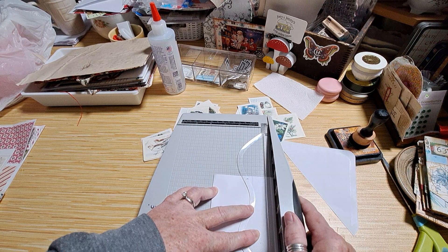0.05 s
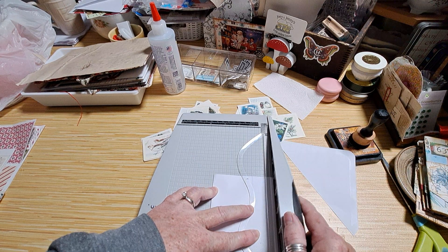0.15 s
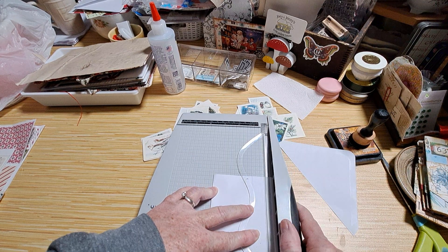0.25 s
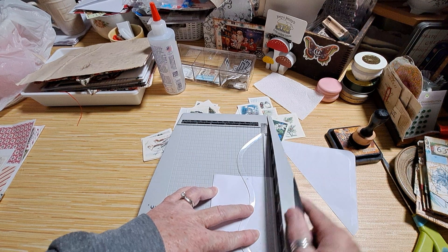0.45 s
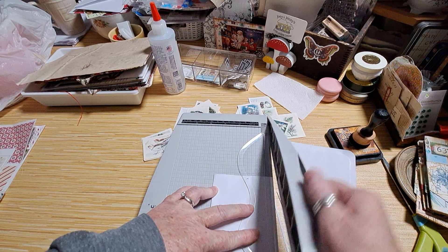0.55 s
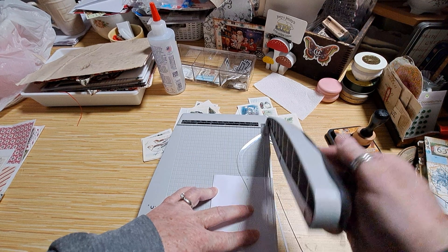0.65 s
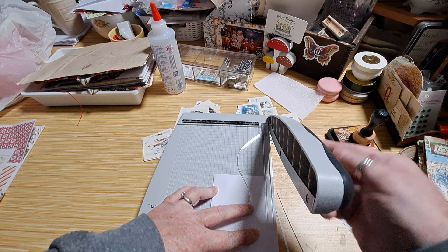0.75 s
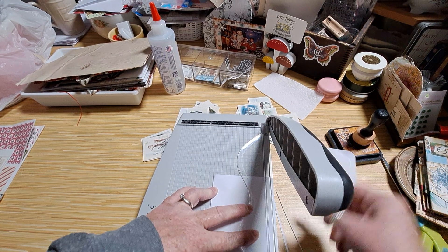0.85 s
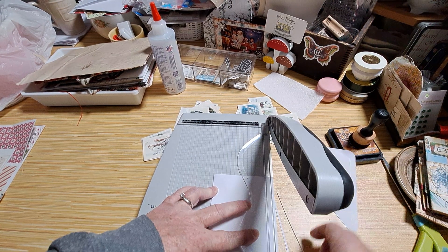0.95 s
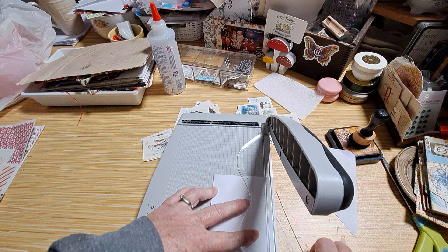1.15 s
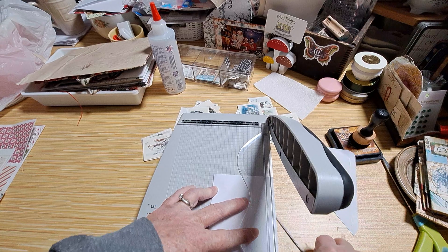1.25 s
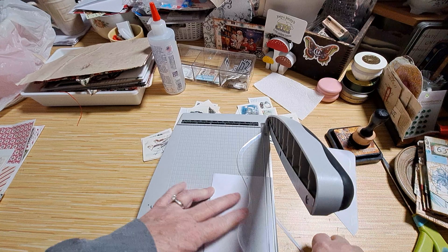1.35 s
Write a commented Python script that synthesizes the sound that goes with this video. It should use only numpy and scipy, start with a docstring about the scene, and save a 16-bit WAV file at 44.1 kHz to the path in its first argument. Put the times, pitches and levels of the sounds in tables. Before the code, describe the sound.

Guillotine paper cutter chops with one sharp thunk, then its arm lifts with a metallic scraping hiss

```python
"""A guillotine paper trimmer on a wooden desk in a small quiet room, close to a stereo microphone.
Its blade shears the last of the sheet (grainy noise) and the arm thumps onto the base (pulse, modes, rattle, tail).
It is drawn up again, steel hissing along steel (noise and resonances) and the hinge rubbing (random slips ringing
modes), and knocks against its stop. A hand shuffles on the desk, mostly at the end (lumpy noise), with paper
rustling and snapping."""
import sys
import numpy as np
from scipy import signal
from scipy.fft import rfft, irfft, next_fast_len
from scipy.io import wavfile

SR = 44100
rng = np.random.default_rng(int(sys.argv[2]) if len(sys.argv) > 2 else 0)


def unload_wav(signal):
    """Save mono or channel-first audio to the path in sys.argv[1] as 16-bit WAV at rate SR, clipped to [-1, 1]."""
    wavfile.write(
        sys.argv[1],
        SR,
        np.round(np.clip(np.atleast_2d(signal).T, -1, 1) * 32767).astype(np.int16),
    )


N = 61739

# Background hush, level over time: start_s, level_db
HUSH_LEVEL = [(0, -45.5), (.2, -103), (.5, -52.5), (.88, -66.5), (1.05, -72), (1.4, -81.5)]
# Background hush, colour: freq_hz, density_db (per Hz)
HUSH_COLOUR = [(30, -3), (60, 0), (120, -3), (200, -3.5), (330, -2.5), (620, 0), (850, -17.5),
               (1500, -19.5), (3300, -27.5), (7500, -27.5), (16000, -31)]

# Arm and hand blows on the base: start_s, level_db, contact_cutoff_hz (hardness), extra_bass_db (weight)
BLOWS = [(0.0005, -41.5, 2433, 10), (0.0691, -52, 896, -6.5), (0.2343, -24, 700, 10),
         (0.241, -22.5, 900, 2.5), (0.262, -11, 5200, -8), (0.2667, -7, 918, -3.5),
         (0.501, -27, 995, -11.5), (1.0825, -48.5, 896, 10.5)]
# Modes of base and desk: freq_hz, level_db, t60_s
BASE_MODES = [(56.9, -11, 0.44), (131, -5, 0.096), (168.7, -5, 0.25), (286.2, -3, 0.099), (319.5, 0.5, 0.1),
              (420, -11.5, 0.14), (496, -6.5, 0.2), (613.5, 5.5, 0.05), (820, 2.5, 0.015), (1098, -2, 0.12),
              (1294, -16.5, 0.11), (1594, -2, 0.061), (1791, 4.5, 0.1), (2110, -6.5, 0.088),
              (2700, -5, .08), (2837, 5, 0.065)]
# Crack of the contact: freq_hz, density_db (per Hz)
CRACK_COLOUR = [(600, -5), (2000, -12), (7000, -15.5), (13000, -6), (16000, -5)]
# Rattle of the dense upper modes: freq_hz, density_db (per Hz)
RATTLE_COLOUR = [(59, -46.5), (100, -13), (502, -9), (1450, -10.5), (2990, -11.5), (3400, -18), (7770, -15),
                 (16000, -49)]
# Rattle decay: freq_hz, t60_s
RATTLE_T60 = [(100, 0.13), (500, 0.11), (2000, 0.19), (16000, .15)]
# Room tail after a blow: freq_hz, density_db (per Hz)
TAIL_COLOUR = [(35, -41), (60, 0), (103, -17.5), (176, -11.5), (515, -14.5), (822, -23), (1950, -17),
               (3270, -26), (16000, -15.5)]
# Tail decay: freq_hz, t60_s
TAIL_T60 = [(60, 0.62), (300, 0.76), (1500, 0.62), (6000, 0.39), (16000, 0.41)]
PULSE_DB, CRACK_DB, MODES_DB, RATTLE_DB, TAIL_DB = 25.5, 2, -10, -7.5, -16.5
WEIGHT_HZ = 302  # a blow's extra bass fades out above this
PULSE_HZ, PULSE_LEAN_DB = 2520, 3.5  # the lean lifts the left and lowers the right
CRACK_T60_S = 0.027
TAIL_SMOOTHING_HZ = 1 / 0.0039  # softens the tail's onset

# Finger shuffles: start_s, level_db, decay_s, brightness_db_per_octave (about 500 Hz)
SHUFFLES = [(0.071, -53.5, 0.024, 1.5), (1.08, -52.5, 0.068, 1), (1.172, -51, 0.046, 1.5),
            (1.264, -54, .03, 3.5), (1.325, -56, 0.029, 5), (1.382, -58.5, 0.029, 3)]
# Fingers on the desk: freq_hz, density_db (per Hz)
HAND_COLOUR = [(29, -62), (50, -8.5), (324, -5), (550, -5.5), (620, -2), (1210, -21.5), (3000, -36.5),
               (3900, -62), (6600, -120)]
# Paper rustle over time: start_s, level_db
RUSTLE_LEVEL = [(.9, -100), (.97, -74), (1.06, -80.5), (1.1, -74), (1.15, -86.5), (1.3, -79), (1.33, -64),
                (1.4, -66)]
# Paper rustle and faint hiss: freq_hz, density_db (per Hz)
RUSTLE_COLOUR = [(1200, -5), (1800, -5.5), (4000, 8.5), (7500, 5.5), (16000, 9)]
# Paper snaps: start_s, level_db
SNAPS = [(0.3775, -58), (0.4713, -49), (0.8996, -59), (1.0175, -57), (1.0815, -54), (1.172, -62),
         (1.2666, -62), (1.3282, -53), (1.391, -56)]
# Colour of a snap: freq_hz, density_db (per Hz)
SNAP_COLOUR = [(4000, -15.5), (7500, 2.5), (10000, -13.5), (13500, -1), (16000, -6.5)]
SHUFFLE_RISE_S, SNAP_T60_S, HISS_DB = .003, 0.009, -87

# Blade through paper: start_s, level_db
SHEAR_LEVEL = [(.218, -76), (.23, -38.5), (.238, -25), (.247, -36.5), (.262, -44)]
# Parting fibres: freq_hz, density_db (per Hz)
SHEAR_COLOUR = [(240, -34), (400, -3), (2180, -16), (5190, -13), (9470, -20.5), (13100, -20), (16000, -36)]

# Blade along its steel edge: start_s, level_db, tilt_db_per_octave (about 4000 Hz)
SLIDE_LEVEL = [(.499, -48, 0), (.5055, -48.5, 2), (.509, -28, -1), (.53, -30.5, 0), (.575, -33, -3),
               (.62, -43.5, -5.5), (.67, -49.5, -4.5), (.72, -59, -5), (.79, -83, -5)]
# Steel hiss: freq_hz, density_db (per Hz)
SLIDE_COLOUR = [(300, -32), (500, -26.5), (700, -5), (1300, -14.5), (1900, -3.5), (4000, -9.5), (8000, -7),
                (10500, -25.5), (12500, -5.5), (16000, -26)]
# Blade resonances: freq_hz, width_hz, bite_level_db, slide_level_db
BLADE_MODES = [(1624, 31, -4.5, -30), (2170, 50, -16.5, -21.5), (2790, 30, -6.5, -13),
               (3113, 32, -19, -10.5), (4044, 80, -1, -22.5), (4760, 59, -20.5, -17.5),
               (5186, 64, -1.5, -17.5), (5662, 89, -0.5, -20), (6380, 110, -7.5, -23.5),
               (7970, 42, -5, -11), (10800, 500, -12, -20)]
# Blade striking the steel edge: start_s, level_db
BITES = [(0.2351, -39.5), (0.2402, -35), (0.2615, -26.5), (.5085, -30.5), (0.5133, -30), (0.519, -33.5)]

# Hinge rub: start_s, level_db (before a trim in arm()), centre_hz (of the excited modes)
HINGE_RUB = [(.54, -71, 1100), (.575, -36.5, 930), (.62, -31, 814), (.66, -34.5, 784), (.70, -38.5, 620),
             (.725, -47, 530), (.76, -49.5, 437), (.79, -69, 404)]
# Arm modes: freq_hz, rub_level_db (before the same trim), stop_level_db, t60_s
ARM_MODES = [(342, 9.5, -17.5, 0.037), (478, -1.5, -25, 0.043), (653, -6, -5, 0.057),
             (712, -3.5, -19, 0.022), (775, -4, -28.5, 0.018), (895, -6.5, -3, 0.049),
             (970, -4, 0.5, 0.048), (1317, -11.5, -17, 0.1), (1730, -20, -11, 0.044),
             (1910, -2, -17.5, 0.097), (2730, -18, -17, 0.052), (3070, -30, -24.5, 0.054)]
# Arm knocking free of the base, then on its stop: start_s, level_db
KNOCKS = [(0.4769, -41.5), (0.7943, -30.5)]
# Rattle of a knock: freq_hz, density_db (per Hz)
STOP_RATTLE_COLOUR = [(710, -5.5), (1200, -4), (1680, -3), (2410, -6), (3960, -10), (15000, -40.5)]
SLIPS_PER_S, HINGE_OCTAVES, STOP_RATTLE_DB = 3400, 0.92, -10.5

# Stereo likeness of the noises: freq_hz, likeness (0 to 1)
LIKENESS = [(60, 0.63), (400, 0.61), (1500, 0.47), (5000, 0.15), (15000, .25)]
# Stereo colour: freq_hz, left_minus_right_db
LEAN = [(100, .3), (700, 1.2), (2400, .6), (5000, 2.8), (9000, 0), (14000, -2.5)]
LAG_S, BLADE_LAG_S, ARM_LAG_S = 0.00016, 0.00021, .00005  # left lags right
MODE_SPREAD_DB = 3.5  # chance gain per side of a mode from 800 Hz up; less below
MIC_LOW_HZ, CUTOFF_HZ = 39, 16300


def amp(db):
    """Gain of a level in dB."""
    return 10 ** (np.asarray(db) / 20)


def rms_one(x):
    """Signal scaled to rms 1."""
    return x / np.sqrt(np.mean(x ** 2) + 1e-20)


def curve(rows):
    """An on/off gate spanning the rows, then each column drawn over time."""
    s, *columns = np.transpose(rows)
    t = np.arange(N) / SR
    gate = (t >= s[0]) & (t <= s[-1])
    return [gate] + [np.interp(t, s, c) for c in columns]


def at_hz(points, hz):
    """Table read on a log-frequency axis."""
    table_hz, values = np.array(points).T
    return np.interp(np.log(hz), np.log(table_hz), values)


def fade(x, t60):
    """One-pole decay; a unit click starts it at height 1."""
    return signal.lfilter([1], [1, -amp(-60 / (t60 * SR))], x + 1e-18)


def soften(x, hz):
    """Double one-pole low-pass."""
    r = np.exp(-2 * np.pi * hz / SR)
    return signal.lfilter([(1 - r) ** 2], [1, -2 * r, r * r], x)


def high(x, hz):
    """Steep high-pass."""
    return signal.sosfilt(signal.butter(3, hz, "high", fs=SR, output="sos"), x)


def ring(force, hz, t60):
    """A unit click sets a decaying sine of starting height 1 ringing."""
    r, w = amp(-60 / (t60 * SR)), 2 * np.pi * hz / SR
    return signal.lfilter([0, np.sin(w)], [1, -2 * r * np.cos(w), r * r], force + 1e-18)


def clicks(s, sizes):
    """Single-sample clicks at the given seconds."""
    out = np.zeros(N)
    out[(np.asarray(s) * SR).astype(int)] = sizes
    return out


def leaning(hz):
    """Left and right gains by chance, so a mode leans to one side, bass modes less."""
    return amp(rng.normal(0, MODE_SPREAD_DB, (2, 1)) * np.clip(hz / 800, .5, 1))


def noise(spectrum, shape):
    """Third-octave bands of stereo noise, rms 1 together at unit shape; shape(hz) is a band's gain in time."""
    edges = 22 * 2 ** np.arange(0, 9.7, 1 / 3)
    white = rng.standard_normal((2, 2, N))
    lowest_hz, highest_hz = spectrum[0][0], spectrum[-1][0]
    out, power = 0, 0
    for k, (low, high_edge) in enumerate(zip(edges, edges[1:])):
        hz = np.sqrt(low * high_edge)
        if not lowest_hz / 2 < hz < highest_hz * 2:
            continue
        # 12 dB per octave roll-off outside the table
        octaves_outside = max(0, np.log2(lowest_hz / hz), np.log2(hz / highest_hz))
        db = at_hz(spectrum, hz) - 12 * octaves_outside
        band = signal.butter(2, [low, high_edge], "band", fs=SR, output="sos")
        mid, side = signal.sosfilt(band, white[k % 2])
        alike = np.clip(at_hz(LIKENESS, hz), 0, 1)
        stereo = np.sqrt(1 + alike) * mid + np.sqrt(1 - alike) * side * [[1], [-1]]
        out = out + amp(db) * shape(hz) * stereo / np.sqrt(2)
        power += amp(2 * db) * (high_edge - low) * 2 / SR
    return out / np.sqrt(power)


def hush():
    """Broadband background noise, its level following a drawn curve."""
    return amp(curve(HUSH_LEVEL)[1]) * noise(HUSH_COLOUR, lambda hz: 1)


def base():
    """Each blow sends a pulse and crack, rings and rattles modes and fills the room; low cut-offs are dull."""
    s, db, cut_hz, bass_db = np.transpose(BLOWS)

    def blows_at(hz):
        """Blow strength at one frequency: weight lifts the bass, a soft contact loses treble."""
        weight_db = bass_db / (1 + (hz / WEIGHT_HZ) ** 2)
        return clicks(s, amp(db + weight_db) / (1 + (hz / cut_hz) ** 2))

    chance_db = rng.normal(0, 1.5, (len(s), len(BASE_MODES)))
    modes = 0
    for k, (hz, mode_db, t60) in enumerate(BASE_MODES):
        struck = blows_at(hz) * clicks(s, amp(mode_db + chance_db[:, k]))
        modes = modes + (-1) ** k * ring(struck, hz, t60) * leaning(hz)

    pulse = -high(soften(blows_at(PULSE_HZ), PULSE_HZ), 490) * amp([[PULSE_LEAN_DB], [-PULSE_LEAN_DB]])
    # crack and rattle read the blow below their own band, so stay brighter; the tail reads above, so is duller
    crack = noise(CRACK_COLOUR, lambda hz: fade(blows_at(hz / 1.7), CRACK_T60_S))

    # decays add up as power, hence the halved t60 and the root
    def rattle_shape(hz):
        return np.sqrt(fade(blows_at(hz / 1.8) ** 2, at_hz(RATTLE_T60, hz) / 2))

    def tail_shape(hz):
        power = fade(blows_at(hz / 0.86) ** 2, at_hz(TAIL_T60, hz) / 2)
        return np.sqrt(soften(power, TAIL_SMOOTHING_HZ))

    rattle = noise(RATTLE_COLOUR, rattle_shape)
    tail = noise(TAIL_COLOUR, tail_shape)
    contact = amp(PULSE_DB) * pulse + amp(CRACK_DB) * crack
    return contact + amp(MODES_DB) * modes + amp(RATTLE_DB) * rattle + amp(TAIL_DB) * tail


def hand():
    """Fingers shuffle on the desk in short lumpy rubs; paper rustles and snaps over a faint hiss."""
    s, db, decay_s, bright_db = np.transpose(SHUFFLES)
    since = (np.arange(N) / SR)[:, None] - s
    rise = np.clip(since / SHUFFLE_RISE_S, 0, 1)
    shapes = rise * np.exp(-(np.maximum(since, 0) / decay_s) ** 1.01)
    lumps = amp(1.8 * rms_one(soften(rng.standard_normal(N), 160)))
    rubs = noise(HAND_COLOUR, lambda hz: lumps * (shapes @ amp(db + bright_db * np.log2(hz / 500))))

    on, rustle_db = curve(RUSTLE_LEVEL)
    rustle_and_hiss = noise(RUSTLE_COLOUR, lambda hz: on * lumps * amp(rustle_db) + amp(HISS_DB))

    snap_s, snap_db = np.transpose(SNAPS)
    snap_shape = fade(clicks(snap_s, amp(snap_db)), SNAP_T60_S)
    return rubs + rustle_and_hiss + noise(SNAP_COLOUR, lambda hz: snap_shape)


def shear():
    """Paper fibres part in a dense grainy burst."""
    on, db = curve(SHEAR_LEVEL)
    grain = amp(2.5 * rms_one(soften(rng.standard_normal(N), 900)))
    return noise(SHEAR_COLOUR, lambda hz: on * amp(db) * grain)


def slide():
    """Steel bites, then hisses on steel through the blade's resonances and dulls as it slows."""
    on, db, tilt = curve(SLIDE_LEVEL)
    grain = amp(1.9 * rms_one(soften(rng.standard_normal(N), 200)))
    hiss = noise(SLIDE_COLOUR, lambda hz: on * grain * amp(db + tilt * np.log2(hz / 4000)))

    rub = rng.standard_normal(N)
    bite_s, bite_db = np.transpose(BITES)
    resonances = 0
    for hz, width_hz, struck_db, rub_db in BLADE_MODES:
        wander = amp(4.0 * rms_one(soften(rng.standard_normal(N), 15)))
        level = on * wander * amp(rub_db + db + tilt * np.log2(hz / 4000))
        t60 = np.log(1000) / np.pi / width_hz
        bites = clicks(bite_s, amp(bite_db + struck_db) * rng.choice([-1, 1], len(bite_s)))
        rubbed = rms_one(ring(rub, hz, t60)) * level
        resonances = resonances + rubbed + ring(bites, hz, t60) * leaning(hz)
    return high(hiss + resonances, 220)


def arm():
    """Uneven slips in the hinge excite ever lower modes as the arm slows; it knocks free, then on its stop."""
    on, db, centre_hz = curve(HINGE_RUB)
    s, knock_db = np.transpose(KNOCKS)
    knock = clicks(s, amp(knock_db))
    modes = 0
    for k, (hz, rub_db, stop_db, t60) in enumerate(ARM_MODES):
        happens = rng.random(N) < SLIPS_PER_S / SR
        size = amp(2.43 * np.minimum(rng.exponential(1, N), 4))
        slips = happens * size * rng.choice([-1, 1], N)
        # modes far from the excited centre get less of the rub
        distance = np.log2(hz / centre_hz) / HINGE_OCTAVES
        rub = rms_one(slips) * on * amp(db + rub_db - 24.5 - 9.2 * distance ** 2)
        struck = (-1) ** k * knock * amp(stop_db)
        modes = modes + ring(rub + struck, hz, t60) * leaning(hz)
    # a short rattle with a faint longer remainder
    rattle = noise(STOP_RATTLE_COLOUR, lambda hz: fade(knock, 0.097) + 0.067 * fade(knock, 0.32))
    return high(modes + amp(STOP_RATTLE_DB) * rattle, 350)


def ports(x, lag_s):
    """Two microphone ports: the left hears a little later, with a colour of its own."""
    size = next_fast_len(N + 2048)
    hz = np.maximum(np.arange(size // 2 + 1) * SR / size, 1)
    # half the difference goes to each side
    half = amp(at_hz(LEAN, hz) / 2) * np.exp(-1j * np.pi * hz * lag_s)
    return irfft(rfft(x * np.ones((2, 1)), size) * [half, 1 / half], size)[:, :N]


def scene():
    """All sources over the background hush, each group with its own stereo lag."""
    desk = hush() + base() + hand() + shear()
    return ports(desk, LAG_S) + ports(slide(), BLADE_LAG_S) + ports(arm(), ARM_LAG_S)


def record(dry):
    """The microphone loses the lowest bass; the top is cut."""
    top_cut = signal.cheby2(14, 70, CUTOFF_HZ, fs=SR, output="sos")
    return signal.sosfilt(top_cut, high(dry, MIC_LOW_HZ))


dry = scene()
out = record(dry)
unload_wav(out)
```